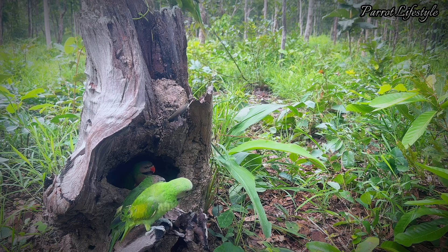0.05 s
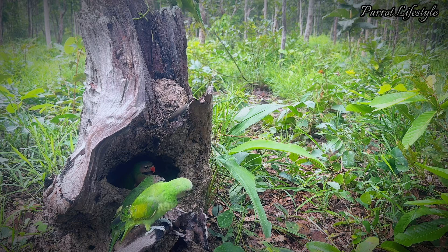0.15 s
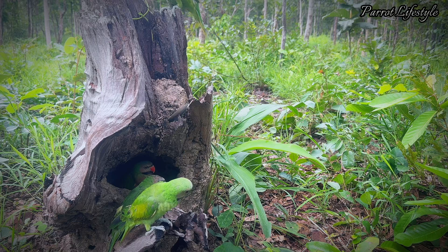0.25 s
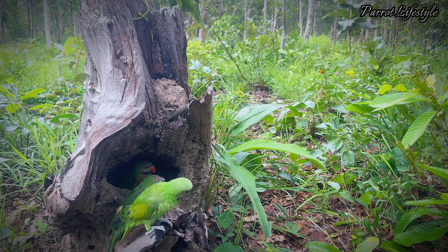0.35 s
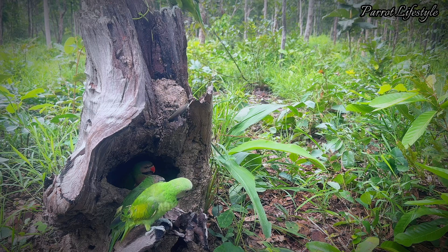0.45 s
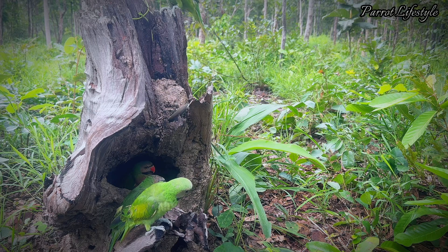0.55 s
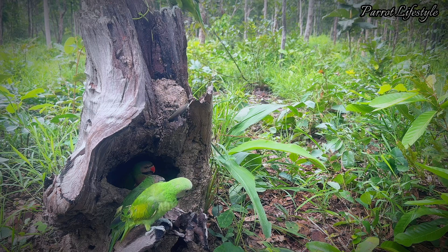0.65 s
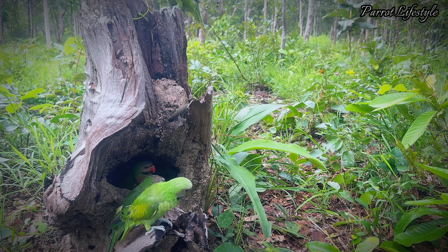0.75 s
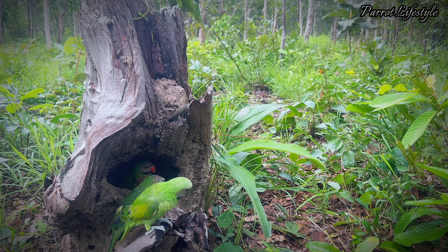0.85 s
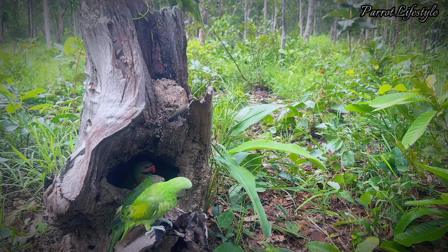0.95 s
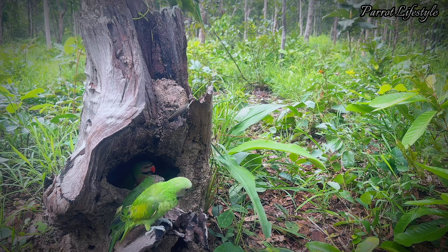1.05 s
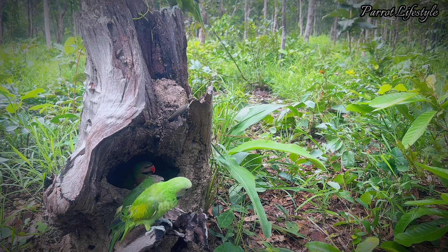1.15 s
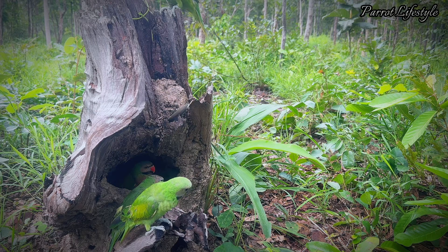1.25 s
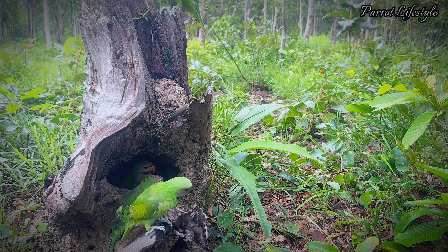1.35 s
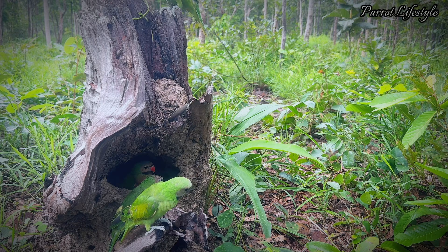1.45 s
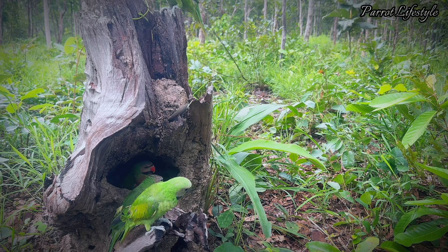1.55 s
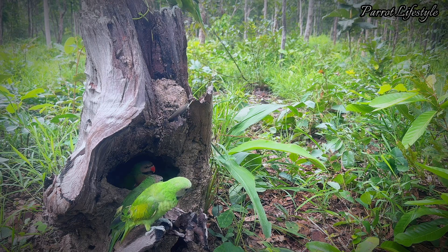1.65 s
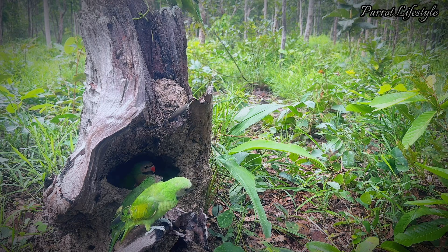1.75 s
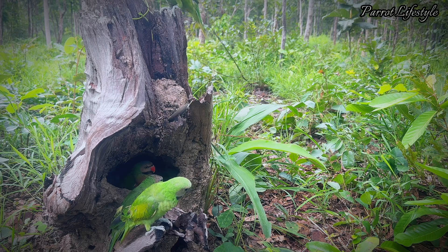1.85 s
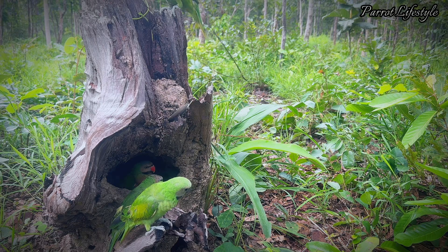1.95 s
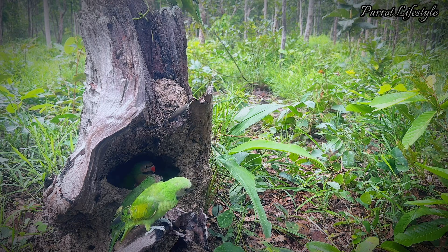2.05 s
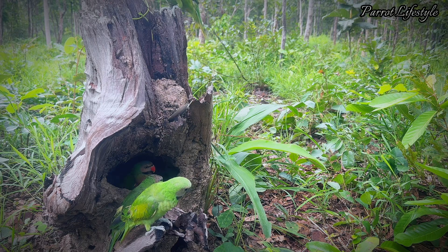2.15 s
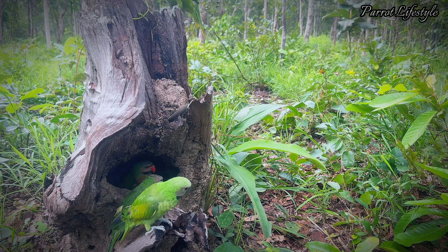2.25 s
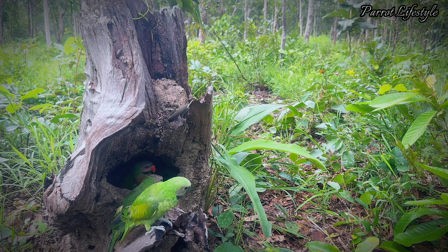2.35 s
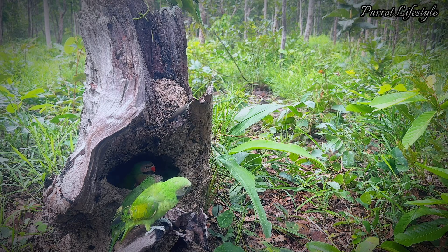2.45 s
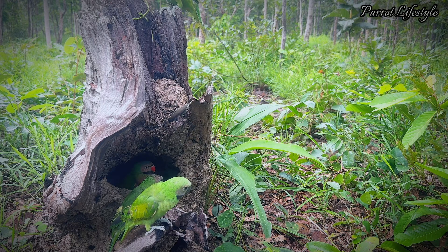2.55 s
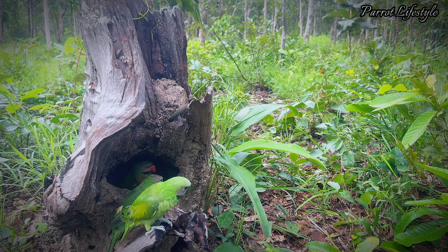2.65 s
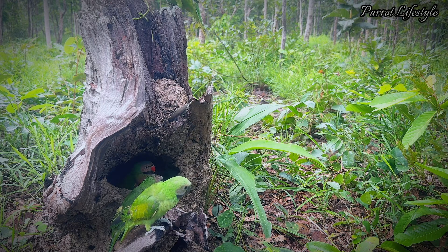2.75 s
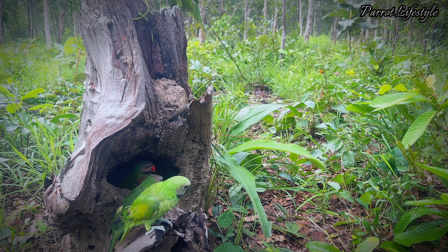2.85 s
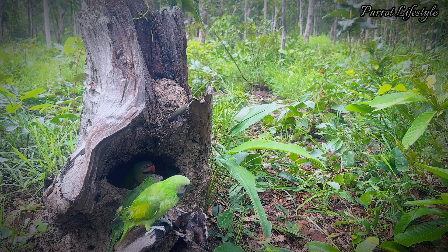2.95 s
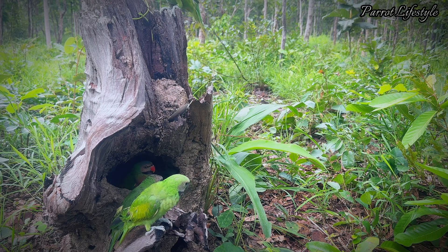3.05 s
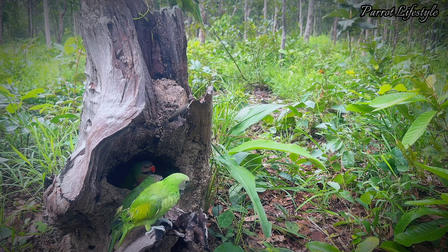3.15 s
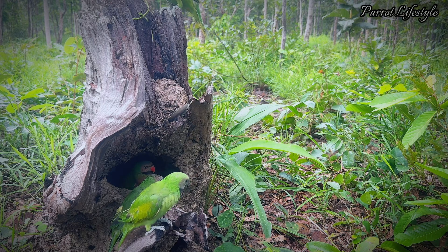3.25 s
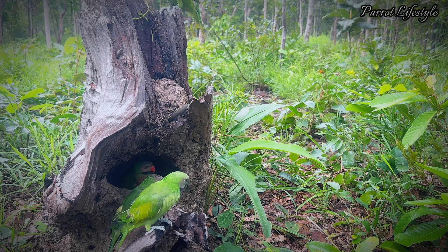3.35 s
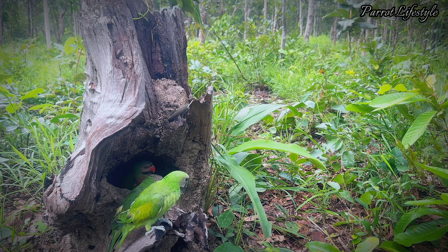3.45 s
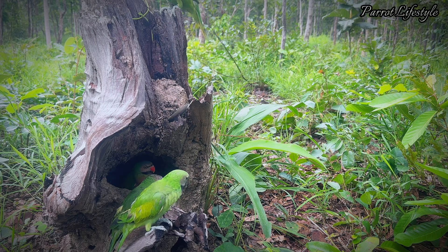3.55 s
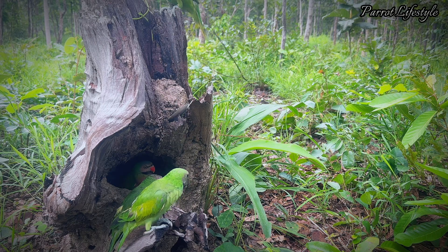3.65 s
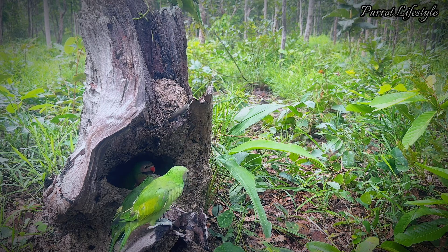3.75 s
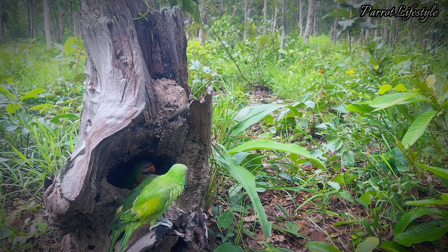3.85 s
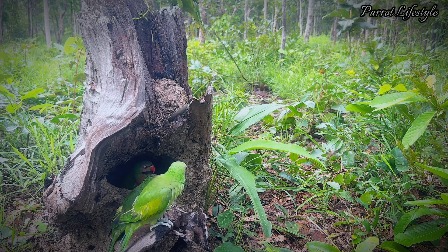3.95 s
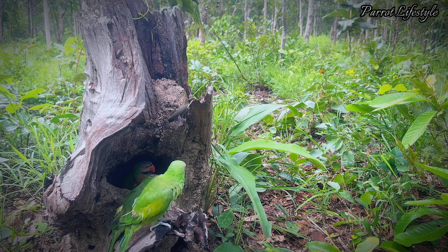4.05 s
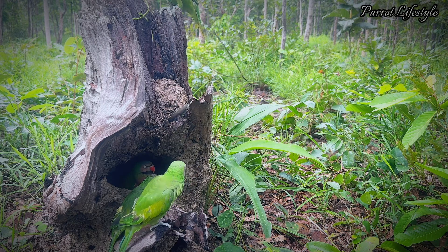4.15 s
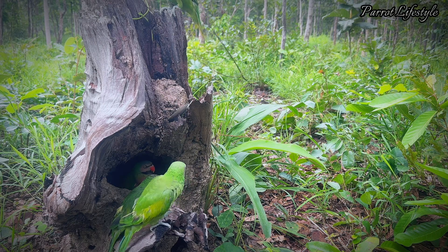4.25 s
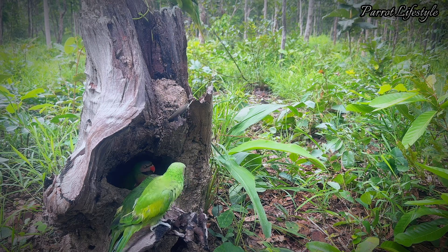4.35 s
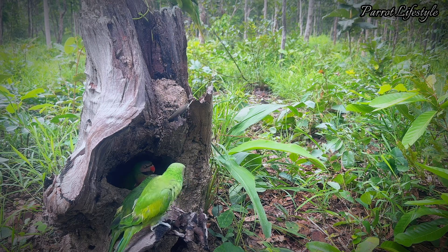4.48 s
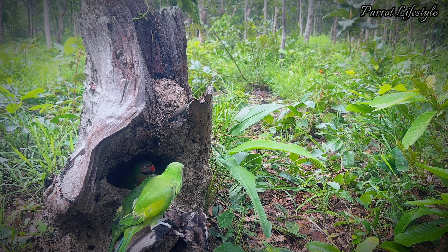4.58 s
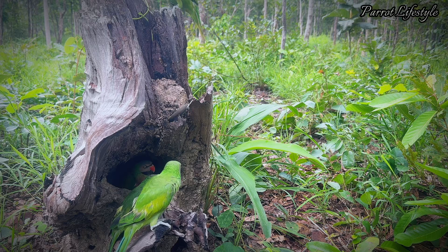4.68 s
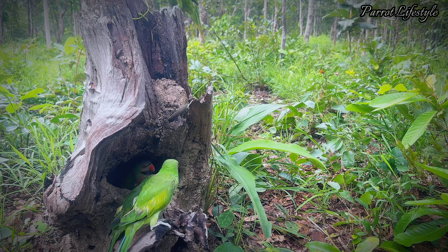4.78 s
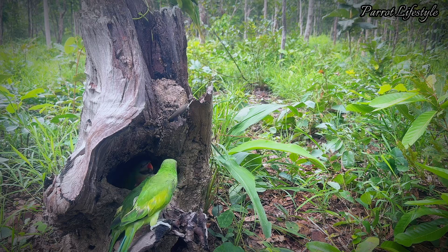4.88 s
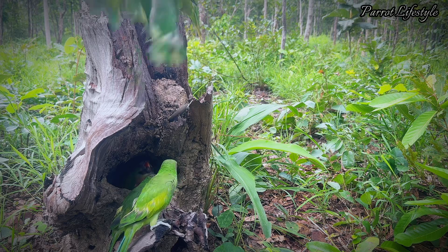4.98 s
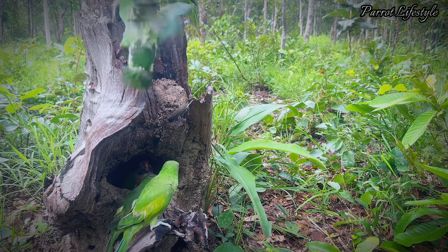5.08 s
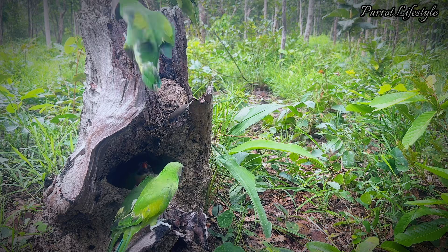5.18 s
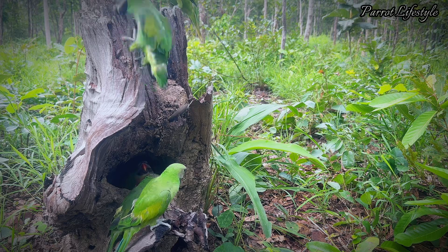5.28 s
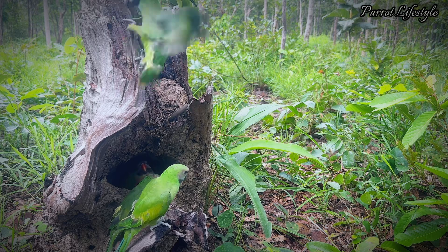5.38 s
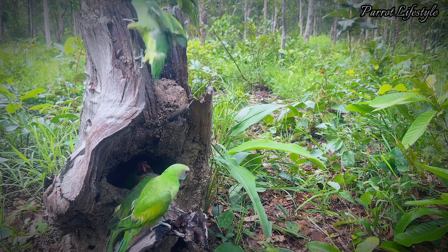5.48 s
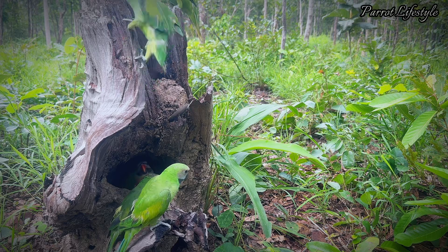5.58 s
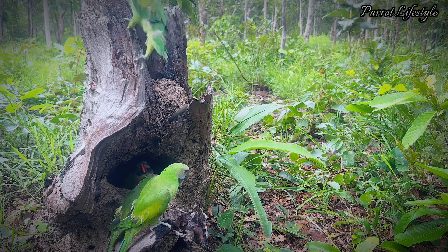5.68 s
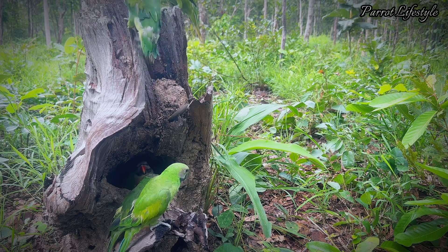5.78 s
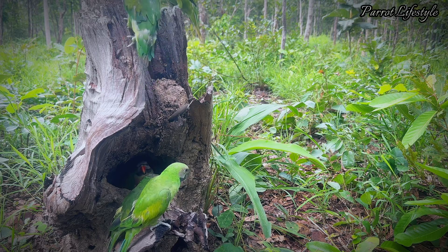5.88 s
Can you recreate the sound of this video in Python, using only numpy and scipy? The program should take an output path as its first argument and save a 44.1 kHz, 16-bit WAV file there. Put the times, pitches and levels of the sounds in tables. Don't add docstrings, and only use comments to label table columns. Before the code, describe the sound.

Beaks and claws tick on a hollow rotten stump, a parakeet squawks once, then another flutters in with sharp wooden cracks and soft thuds.

```python
import sys
import numpy as np
from scipy import signal
from scipy.fft import rfft, irfft, next_fast_len
from scipy.io import wavfile
from scipy.ndimage import uniform_filter1d, map_coordinates

SR = 44100
rng = np.random.default_rng(int(sys.argv[2]) if len(sys.argv) > 2 else 0)


def dump_mix(stems):
    frames = np.atleast_2d(stems).T
    limited = np.clip(frames, -1, 1)
    pcm = np.round(limited * 32767).astype(np.int16)
    wavfile.write(sys.argv[1], SR, pcm)


def gain_from_db(level_db):
    decades = np.asarray(level_db, float) / 20
    return 10 ** decades


N = 261072

# (frequency [Hz], density [dB per Hz])
FINE_RUSTLE = [(4000, -48), (7000, -2), (10000, -4), (15500, -5), (17000, -18)]


def unit(x):
    return x / np.sqrt(np.mean(x ** 2) + 1e-20)


def curves(rows, before=-120):
    s, *cols = np.transpose(rows)
    return [np.interp(np.arange(N) / SR, s, c, before, before) for c in cols]


def wobble(rate):
    knots = rng.standard_normal(int(N * rate / SR) + 4)
    return map_coordinates(knots, [np.arange(N) * rate / SR])


def noise():
    return rng.standard_normal(N)


def grainy(rate, depth_db):
    return noise() * gain_from_db(depth_db * wobble(rate))


def filtered(x, response):
    m = next_fast_len(len(x) + 8192)
    return irfft(rfft(x, m) * response(np.fft.rfftfreq(m, 1 / SR)), m)[:len(x)]


def coloured(x, spectrum):
    f, db = np.transpose(spectrum)
    return unit(filtered(x, lambda hz: gain_from_db(np.interp(np.log(hz + 1), np.log(f), db, -120, -120))))


def resonant(x, modes):
    def response(f):
        total = 0
        for k, (centre, width, db) in enumerate(modes):
            damping = 1j * f * width
            total = total + (-1) ** k * gain_from_db(db) * damping / (centre * centre - f * f + damping)
        return total
    return filtered(x, response)


def swells(rows):
    rise_s, fade_s = 0.033, 0.063
    t = np.arange(N) / SR
    total = 0
    for s, length, db in rows:
        rise = np.clip((t - s) / rise_s, 0, 1)
        fade = np.exp(-np.maximum(t - s - length, 0) / fade_s * 2)
        total = total + gain_from_db(db) * rise * fade
    return total


def answer(x, t60):
    t = np.arange(SR // 5) / SR
    tail = rng.standard_normal(len(t)) * gain_from_db(-60 * t / t60)
    return signal.fftconvolve(x, tail / np.linalg.norm(tail))[:N]


def forest():
    # (time [s], level [dB])
    breeze = [(0, -0.5), (.5, 1.5), (.95, -0.24), (1.5, 0.5), (1.9, -0.47), (3.2, -0.6), (3.55, 0.2),
              (4.1, -1.5), (4.55, 0.1), (5.5, 0.44), (5.92, -0.2)]
    # (frequency [Hz], density [dB per Hz])
    rumble_spectrum = [(18, -57), (30, -70), (47, -7), (70, -1.5), (92, 1), (200, -12), (260, -47),
                       (440, -120)]
    # (frequency [Hz], density [dB per Hz])
    leaf_spectrum = [(88, -10.5), (150, -2.5), (382, -9.5), (446, -5), (509, -13.5), (678, -11),
                     (853, -14.5), (1700, -5), (2010, -5), (5130, -5.5), (6100, -14.5), (7520, -19.5),
                     (9460, -30), (14400, -78)]
    gust_db, = curves(breeze, before=0)
    rumble = gain_from_db(-73 + 2.2 * gust_db) * coloured(noise(), rumble_spectrum)
    hiss = gain_from_db(-65 + gust_db + 0.4 * wobble(2.4)) * coloured(noise(), leaf_spectrum)

    period_s, first_top_s = 0.88, 0.38
    chorus_db = -79 + 4 * np.cos(2 * np.pi * (np.arange(N) / SR - first_top_s) / period_s)
    chorus_band = [(7250, 1200, 0)]
    insects = unit(resonant(resonant(noise(), chorus_band), chorus_band))
    trill = unit(resonant(resonant(noise(), [(5000, 680, 0)]), [(4940, 690, 0)]))
    return rumble + hiss + gain_from_db(chorus_db) * insects + gain_from_db(-76) * trill


def shuffle():
    # (start [s], length [s], dull stir [dB], fine rustle [dB])
    stirs = [
        (0.214, 0.12, -68, -82.5),
        (.38, 0.11, -71.5, -84),
        (0.535, 0.18, -67.5, -100),
        (1.18, 0.3, -73, -103),
        (2.36, 0.33, -75, -110),
    ]
    # (frequency [Hz], density [dB per Hz])
    debris = [(100, -16.5), (220, -2), (500, -10), (1200, -6.5), (3000, -21), (6000, -52)]
    dull_gain = swells([(s, length, db) for s, length, db, _ in stirs])
    fine_gain = swells([(s, length, db) for s, length, _, db in stirs])
    dull = dull_gain * coloured(grainy(30.1, 4.8), debris)
    return dull + fine_gain * coloured(grainy(66, 5.2), FINE_RUSTLE)


def wings():
    # (time [s], level [dB])
    flight = [(4.57, -103), (4.62, -66.5), (4.69, -48.5), (4.756, -42), (4.8, -43), (4.86, -46),
              (5.03, -52), (5.06, -61), (5.12, -88)]
    # (time [s], swell [dB], length [s])
    strokes = [
        (4.667, 7, 0.021),
        (4.703, 10.5, .008),
        (4.735, 7, 0.0094),
        (4.76, 5.5, 0.009),
        (4.78, -1.5, .008),
        (4.827, 10.5, 0.015),
        (4.909, 17.5, 0.0087),
        (4.938, 0, 0.0062),
        (4.992, 12.5, 0.0099),
    ]
    # (start [s], length [s], rustle [dB])
    fold_moves = [
        (5.09, 0.082, -78),
        (5.17, .04, -84),
        (5.27, .065, -70.5),
        (5.365, 0.081, -79),
        (5.73, 0.11, -78),
    ]
    # (frequency [Hz], density [dB per Hz])
    push_spectrum = [(25, -37), (50, -3), (75, -1.5), (150, -11), (300, -31), (500, -50)]
    # (frequency [Hz], density [dB per Hz])
    swish_spectrum = [(150, -5.5), (250, -2.5), (369, -3), (868, -6.5), (1100, -5), (2440, -11.5),
                      (5020, -14.5), (9000, -37), (11700, -42), (19800, -120)]
    effort_db, = curves(flight)
    t = np.arange(N) / SR
    beat_db = sum(db * np.exp(-((t - s) / length) ** 2) for s, db, length in strokes)
    feather_db = np.where(effort_db > -119, -48 + 0.57 * (effort_db + 48), -160)
    folds = swells(fold_moves)

    push = gain_from_db(effort_db) * coloured(noise(), push_spectrum)
    swish_gain = gain_from_db(feather_db - 4.5 + beat_db) + gain_from_db(6) * folds
    swish = swish_gain * coloured(gain_from_db(1.6 * wobble(60)) * grainy(900, 2.4), swish_spectrum)
    rustle_gain = gain_from_db(feather_db - 18.5 + 0.97 * beat_db) + folds
    rustle = rustle_gain * coloured(grainy(600, 4.0), FINE_RUSTLE)
    return push + swish + rustle


def thuds():
    # (time [s], peak [dB], pitch [Hz])
    landings = [
        (0.292, -52, 230),
        (1.718, -52.5, 266),
        (2.44, -59, 199),
        (4.754, -36, 444),
        (5.374, -43.5, 317),
        (5.779, -55.5, 153),
    ]
    out = np.zeros(N + SR)
    t = np.arange(SR // 10) / SR
    for s, db, hz in landings:
        envelope = gain_from_db(db - 0.5 - 60 * t / 0.038) * (1 - np.exp(-t / 0.00082))
        out[round(s * SR):][:len(t)] += envelope * np.sin(2 * np.pi * hz * t)
    return out[:N]


def contacts(rows, t60):
    # (frequency [Hz], width [Hz], level [dB])
    shell = [(1500, 140, 2), (2000, 340, 1.6), (2880, 860, 2.5), (4270, 460, 0), (5000, 480, 0)]
    # (frequency [Hz], width [Hz], level [dB])
    tip = [(4570, 5400, -0.5), (6750, 4200, 3.5), (10500, 2700, -4), (14300, 2300, -6)]
    knock, ring, scratch = np.zeros((3, N + SR))
    t = np.arange(SR // 8) / SR
    for s, db, knock_db, hz, scratch_db in rows:
        burst = rng.standard_normal((3, len(t))) * gain_from_db(-60 * t / t60)
        burst *= 1 - np.exp(-t / 0.0003)
        burst[:, 0] = [7, 8, 6.5]
        life = 0.042 * min(1, 950 / hz) ** 3.7
        hollow = np.sin(2 * np.pi * hz * t) * gain_from_db(-60 * t / life)
        hollow += 1.1 * np.sin(2 * np.pi * 1.474 * hz * t) * gain_from_db(-60 * t / 0.006)
        blow = signal.fftconvolve(burst[0] * gain_from_db(-60 * t / 0.089), hollow)[:len(t)]
        here = slice(round(s * SR), round(s * SR) + len(t))
        knock[here] += gain_from_db(db + knock_db + 6.5) * blow / np.abs(blow).max()
        ring[here] += gain_from_db(db - 1.5) * burst[1]
        scratch[here] += gain_from_db(db + scratch_db) * burst[2]
    wood_band = signal.butter(3, [550, 5600], "band", fs=SR, output="sos")
    bark_band = signal.butter(2, 3500, "high", fs=SR, output="sos")
    soft = signal.sosfilt(wood_band, knock + resonant(ring, shell))
    edge = signal.sosfilt(bark_band, resonant(scratch, tip))
    return (soft + edge)[:N] + gain_from_db(-15) * answer(edge, 0.2)


def beaks_and_claws():
    # (time [s], peak [dB], hollow knock [dB], its pitch [Hz], bright scratch [dB])
    pecks = [(0.545, -57.5, -0.5, 1070, -31), (0.5744, -54, -6, 920, -27), (0.599, -57, 3, 1000, -16),
             (0.6, -51, 2.5, 1520, -30), (0.8822, -61, -8, 1350, -2), (0.9482, -52, -4.5, 1450, -21),
             (1.0981, -52, -24, 1350, 5.5), (1.21, -50.5, -15, 1400, -4.5), (1.338, -47, -22, 1400, 3),
             (1.4175, -46.5, -39, 1130, 4), (1.712, -35, -4.5, 1277, -18.5),
             (2.2538, -46.5, -25, 1110, -13), (2.263, -51.5, -14.5, 1180, 11.5),
             (2.5215, -48, -15, 1360, -2.5), (2.8635, -55, -22, 1200, -3.5), (4.4962, -52, -12, 1100, -38)]
    snaps = [
        (4.6879, -34.5, -0.5, 1700, 1.5),
        (4.7, -39, 6, 1730, 5),
        (4.703, -26, -4.5, 1420, -7),
        (4.7208, -39, -8, 1550, -14),
        (4.7545, -34, 0.5, 1220, -2.5),
        (4.8193, -48, -12, 1490, -19),
        (4.8245, -30.5, -2.5, 1580, 1),
        (4.8973, -25.5, -32, 1700, -10),
        (4.9037, -23, -10, 1580, -17),
        (4.9065, -23, -17, 1390, -7),
    ]
    claws = [(4.9825, -21.5, -11, 1720, -15), (4.986, -17.5, -6.5, 1366, -17), (5.01, -36.5, 5.5, 960, -16),
             (5.0673, -35, -17, 960, -35), (5.1234, -50, -26, 1390, -4),
             (5.1665, -45.5, -20.5, 1650, -11.5), (5.239, -51, -5, 1480, -30),
             (5.332, -33, -5.5, 1520, -26), (5.3731, -30, -12, 1600, -19.5), (5.4255, -47, -26, 1360, -12),
             (5.5064, -68, -33, 1570, 1), (5.718, -61.5, 0, 1430, 0), (5.7657, -43.5, -13, 1620, -11),
             (5.7877, -36.5, -13, 1390, -10.5), (5.8283, -52.5, -4, 1660, -8)]
    return contacts(pecks, t60=0.038) + contacts(snaps, t60=0.0089) + contacts(claws, t60=0.033)


def voice(rows, tilt_db):
    # (frequency [Hz], width [Hz], level [dB])
    throat = [(476, 460, -7), (960, 450, -1.5), (1580, 570, 1.5), (2790, 1120, 0.7), (4060, 1170, 0.5),
              (5170, 850, 1.5), (8570, 1460, -7), (14700, 2000, -12)]
    # (frequency [Hz], width [Hz], level [dB])
    shut_throat = [(360, 420, -8), (900, 290, 0), (1400, 380, 0.5), (2710, 550, -0.5), (4820, 760, 0.5),
                   (8270, 690, -8)]
    span = slice(round(rows[0][0] * SR), round(rows[-1][0] * SR))
    hz, db, rough = (c[span] for c in curves(rows))
    rough = np.clip(rough, 0, 1)
    phase = 2 * np.pi * np.cumsum(hz * (1 + 0.0883 * rough * wobble(700)[span])) / SR

    k = np.arange(1, 60)[:, None]
    edge = np.where(k * hz > 6300, np.clip(4 * rough, 0, 1), 1)
    edge = edge * (k * hz < 0.45 * SR)
    partials = np.cos(k * phase - (k * hz / 1900) ** 2)
    pulses = (gain_from_db(tilt_db * np.log2(k)) * edge * partials).sum(0)
    puffs = rng.standard_normal(len(hz)) * (1 + np.cos(phase)) ** 2
    source = pulses * gain_from_db(3.2 * rough * wobble(400)[span]) + rough * puffs

    shut = np.clip((450 - hz) / 50, 0, 1)
    open_sound = resonant(resonant(source, throat), throat)
    shut_sound = resonant(resonant(source, shut_throat), shut_throat)
    sound = (1 - shut) * open_sound + shut * shut_sound
    loudness = np.sqrt(np.abs(uniform_filter1d(sound ** 2, size=200)) + 1e-3)
    out = np.zeros(N)
    out[span] = gain_from_db(db) * sound / loudness
    return out


def squawk():
    # (time [s], pitch [Hz], level [dB], roughness [0-1])
    rise = [
        (3.3105, 377, -47, 0.1),
        (3.313, 398, -42.5, 0.02),
        (3.325, 630, -34.5, 0.3),
        (3.333, 875, -35.5, 0.05),
        (3.340, 1484, -29.5, 0.3),
        (3.346, 1840, -40, 0.3),
        (3.350, 1700, -50, 0.2),
    ]
    whistle = [
        (3.342, 2350, -56, .1),
        (3.345, 2490, -32, 0.1),
        (3.353, 2510, -33, 0.12),
        (3.3552, 2200, -36, 0.15),
        (3.3575, 1900, -55, .15),
    ]
    fall = [
        (3.3555, 1500, -49, 0.23),
        (3.3575, 1406, -27, 0.38),
        (3.365, 1045, -24, 0.433),
        (3.374, 617.3, -27, 0.25),
        (3.388, 496.5, -30, 0.29),
        (3.399, 452.5, -31.5, 0.3),
    ]
    creak = [
        (3.405, 1039, -37, .05),
        (3.413, 1048, -41, 0.24),
        (3.428, 979, -41, 0.108),
        (3.443, 824, -44.5, 0.081),
        (3.452, 463, -41.5, .12),
        (3.462, 346.3, -41.5, 0.21),
        (3.480, 284.4, -49, 0.41),
        (3.494, 263, -47, 0.2),
        (3.503, 255, -74, .15),
    ]
    direct = voice(rise, tilt_db=-6.5) + voice(whistle, tilt_db=-1) + voice(fall + creak, tilt_db=-3.0)
    return direct + gain_from_db(-10.5) * answer(direct, 0.035)


def scene():
    background = forest() + shuffle()
    return (background + wings() + thuds() + beaks_and_claws() + squawk())[None]


def band_limit(x):
    return signal.sosfilt(signal.butter(12, 16660, fs=SR, output="sos"), x)


def record(dry):
    # (frequency [Hz], density [dB per Hz])
    self_noise = [(2000, 0), (10000, 0), (14300, -2), (14700, -40)]
    heard = dry[0] + gain_from_db(-96.5) * coloured(noise(), self_noise)

    def band(hz):
        bass_loss = 1 + (42 / (hz + 1)) ** 6
        top_loss = 1 + (hz / 15900) ** 160
        return 1 / np.sqrt(bass_loss * top_loss)
    return band_limit(filtered(heard, band)[None])


dry = scene()
out = record(dry)
dump_mix(out)
```